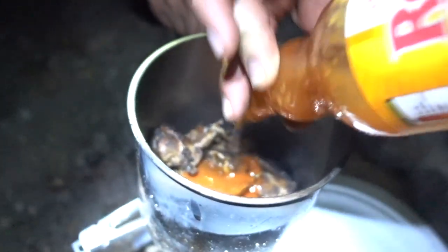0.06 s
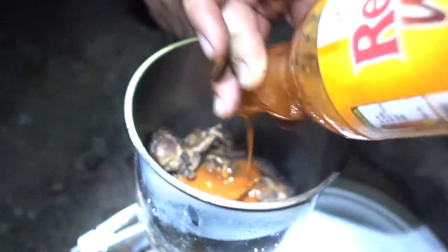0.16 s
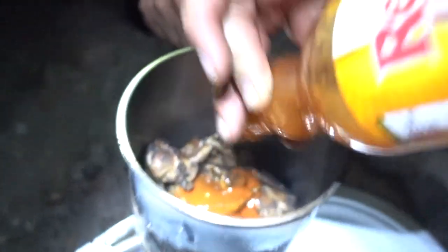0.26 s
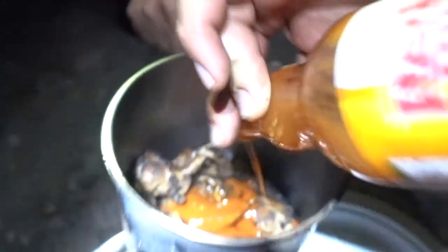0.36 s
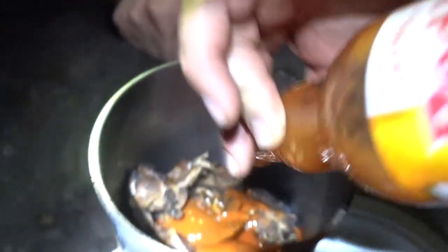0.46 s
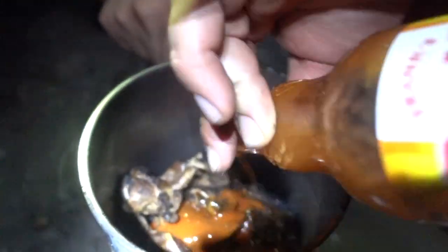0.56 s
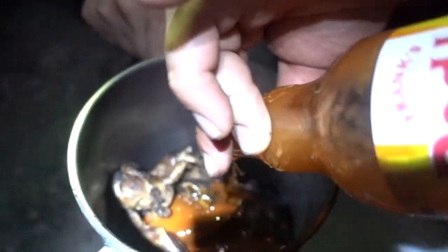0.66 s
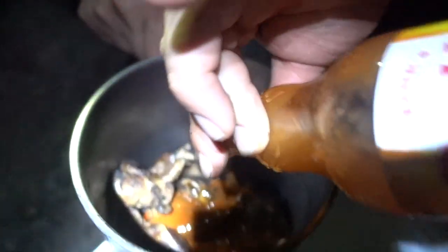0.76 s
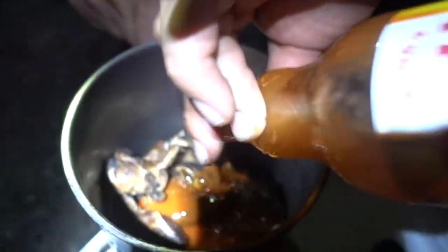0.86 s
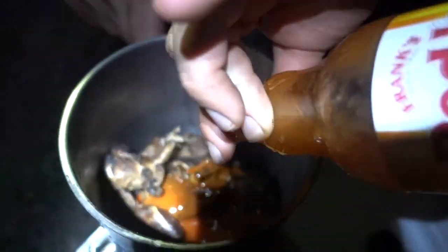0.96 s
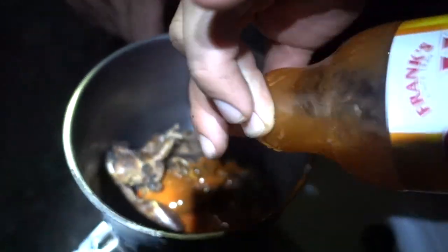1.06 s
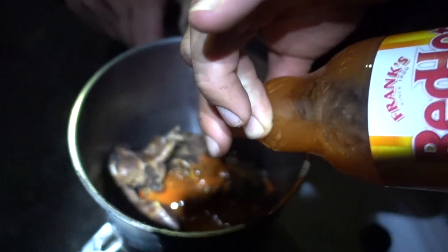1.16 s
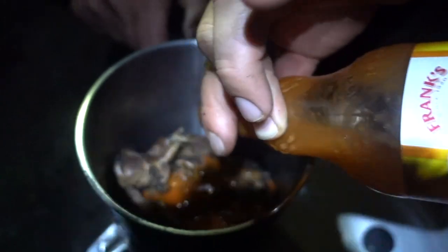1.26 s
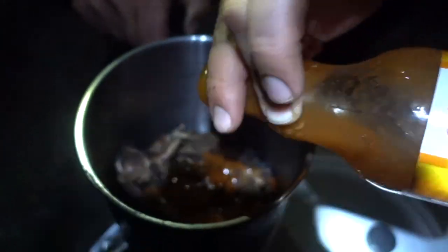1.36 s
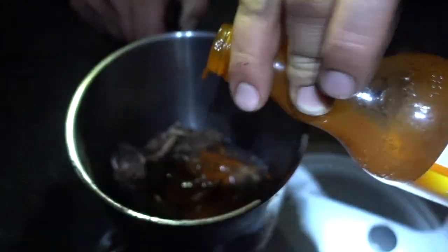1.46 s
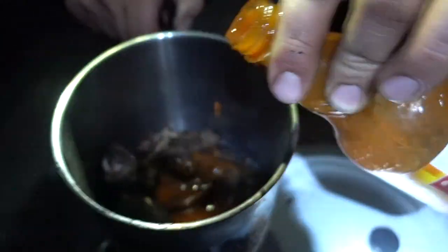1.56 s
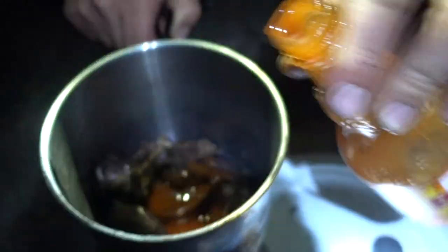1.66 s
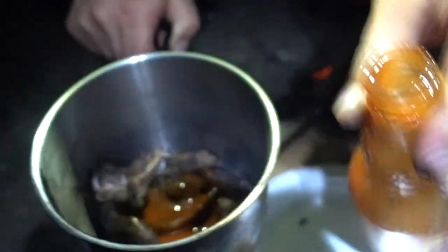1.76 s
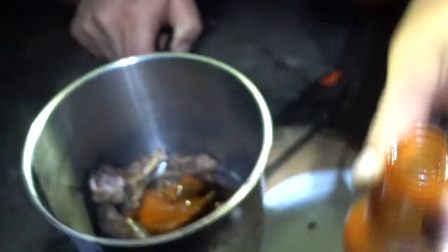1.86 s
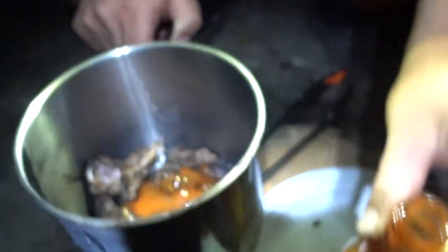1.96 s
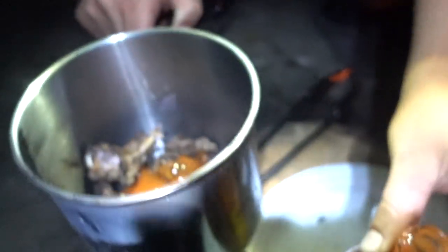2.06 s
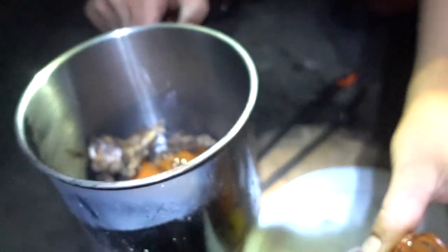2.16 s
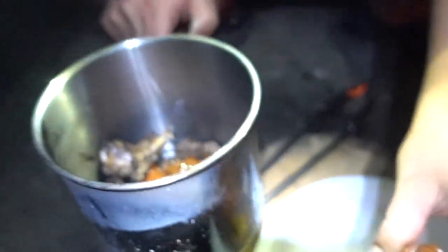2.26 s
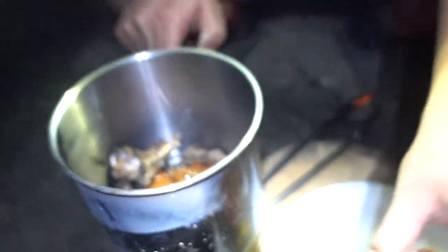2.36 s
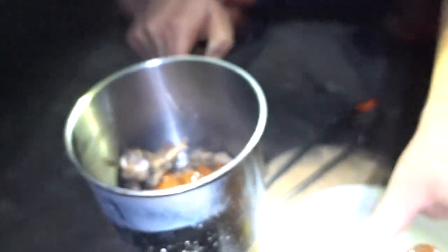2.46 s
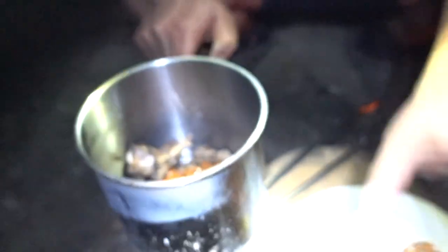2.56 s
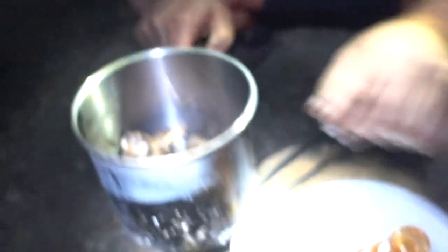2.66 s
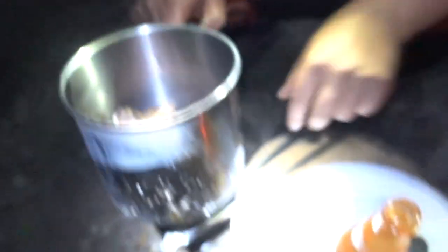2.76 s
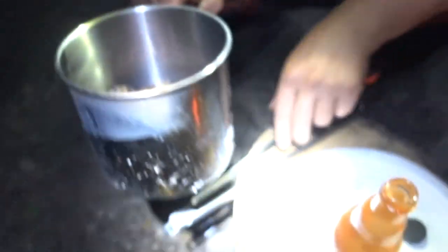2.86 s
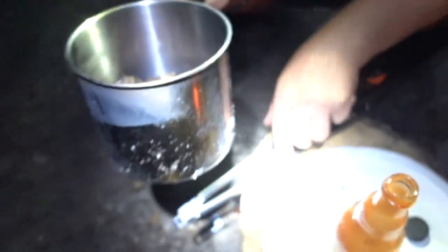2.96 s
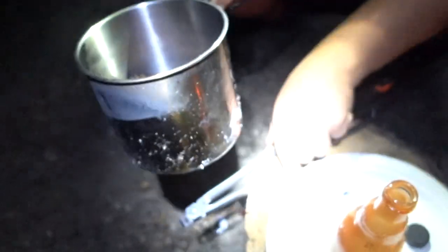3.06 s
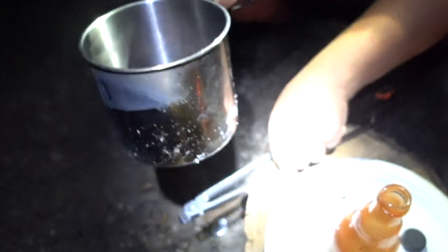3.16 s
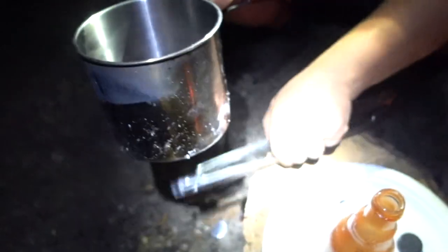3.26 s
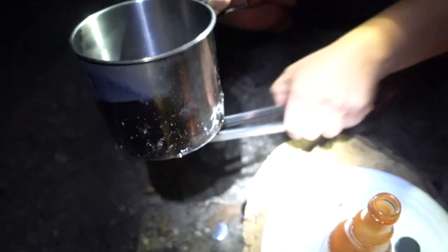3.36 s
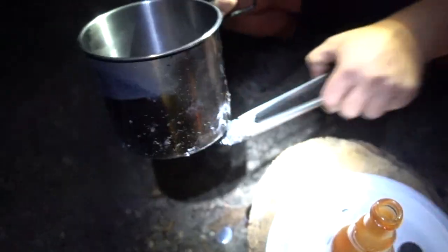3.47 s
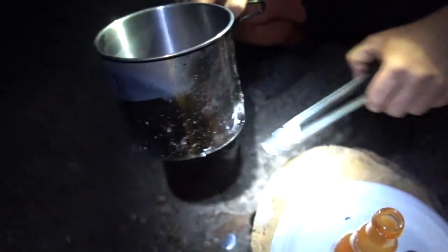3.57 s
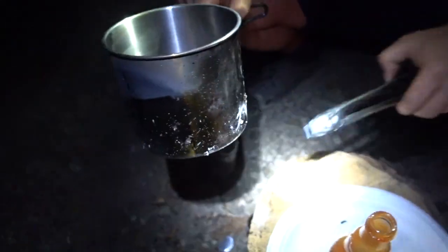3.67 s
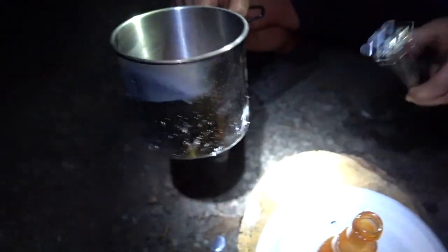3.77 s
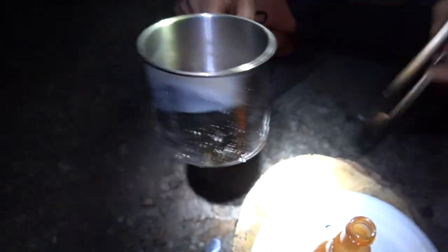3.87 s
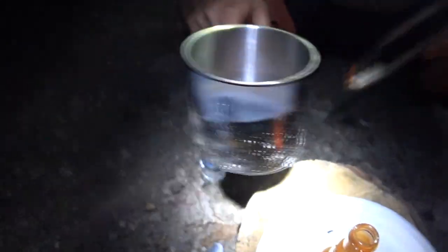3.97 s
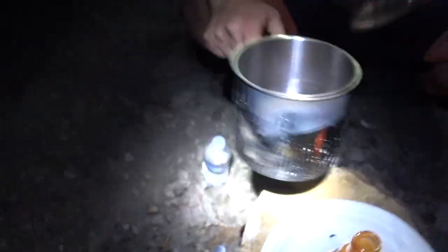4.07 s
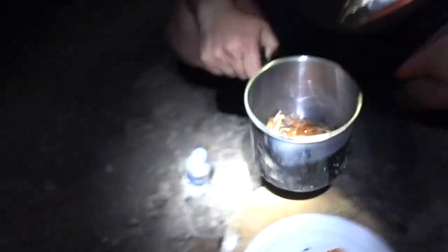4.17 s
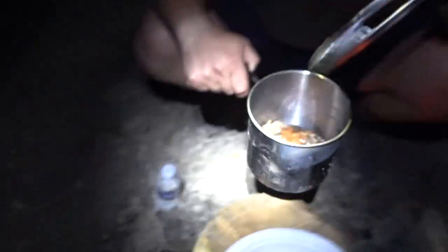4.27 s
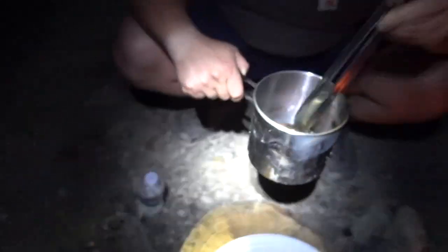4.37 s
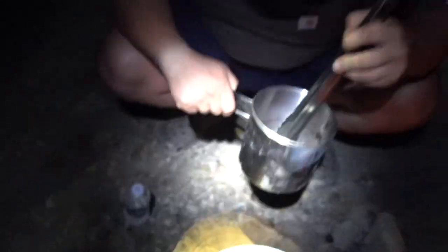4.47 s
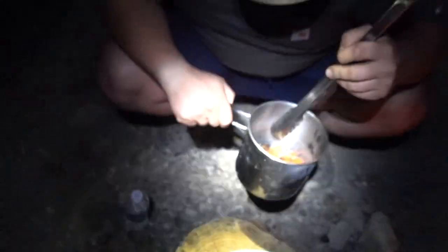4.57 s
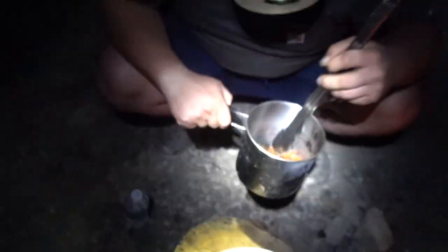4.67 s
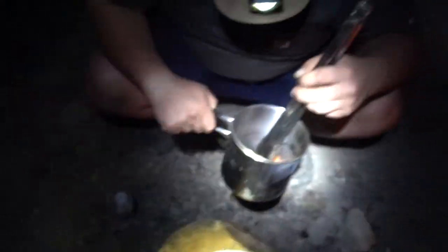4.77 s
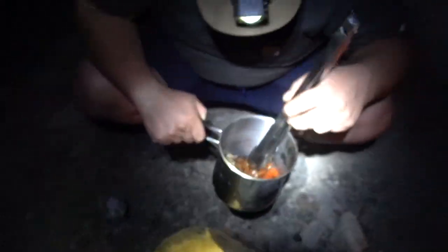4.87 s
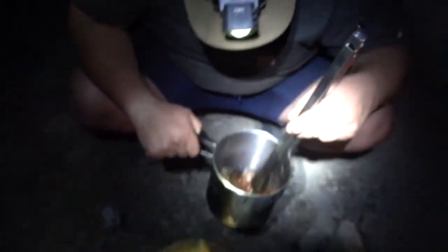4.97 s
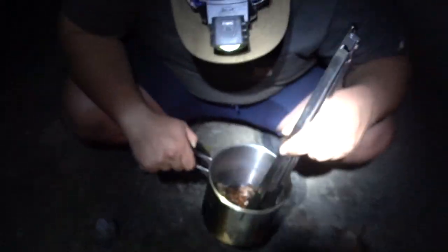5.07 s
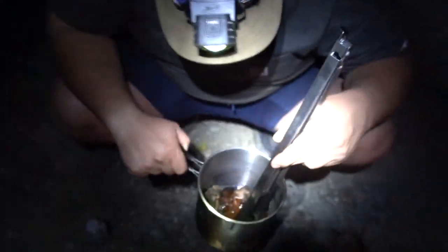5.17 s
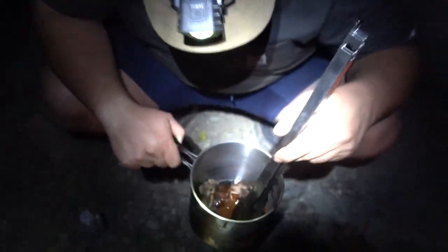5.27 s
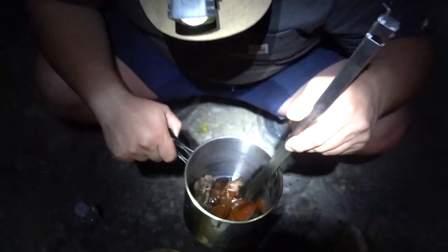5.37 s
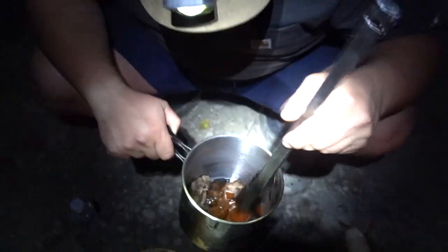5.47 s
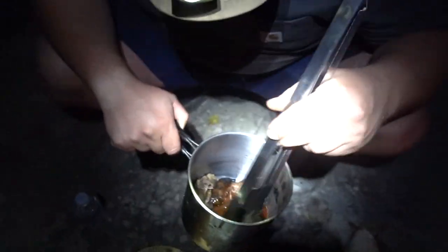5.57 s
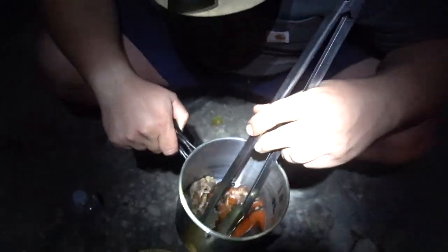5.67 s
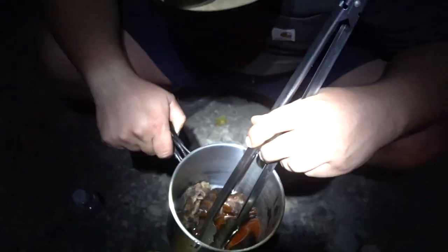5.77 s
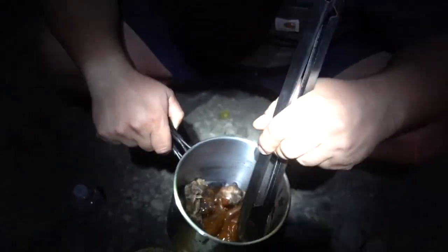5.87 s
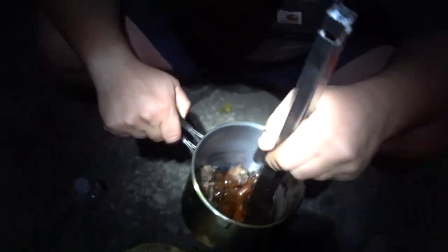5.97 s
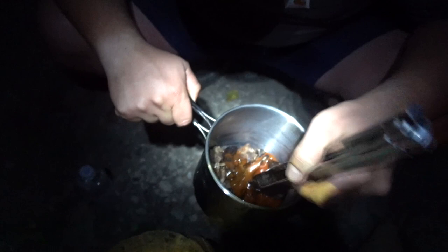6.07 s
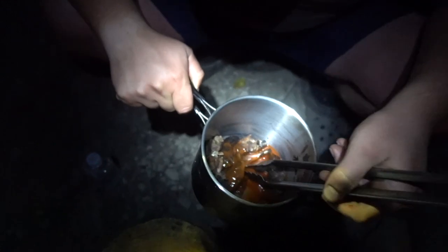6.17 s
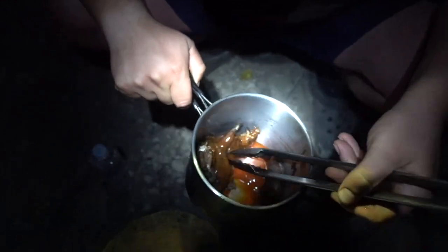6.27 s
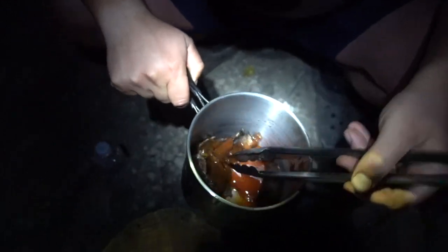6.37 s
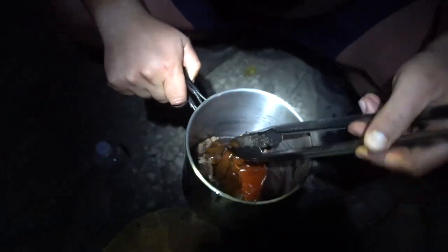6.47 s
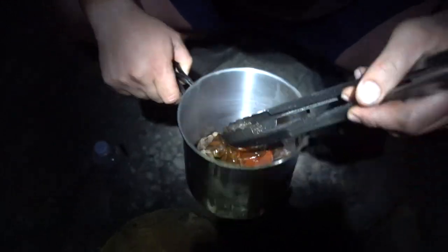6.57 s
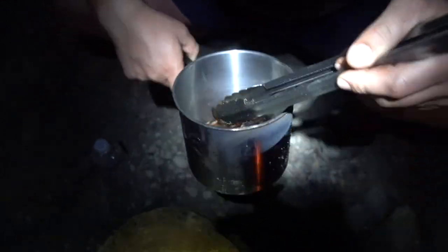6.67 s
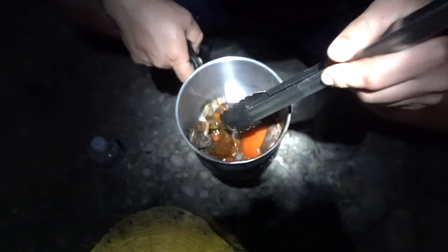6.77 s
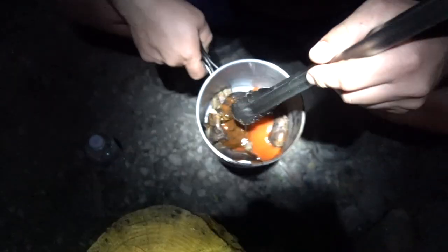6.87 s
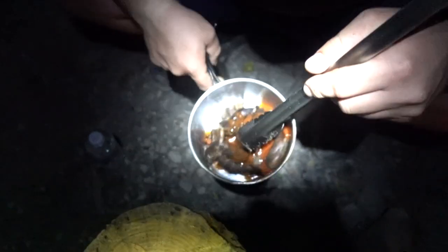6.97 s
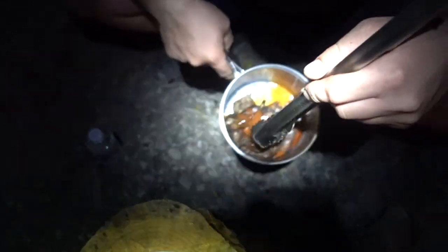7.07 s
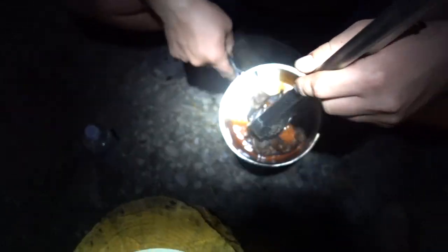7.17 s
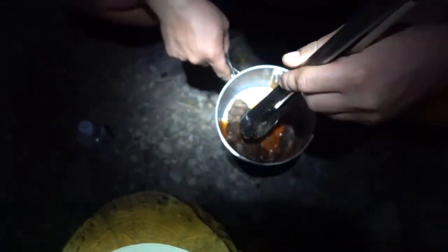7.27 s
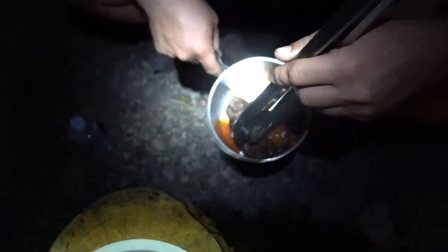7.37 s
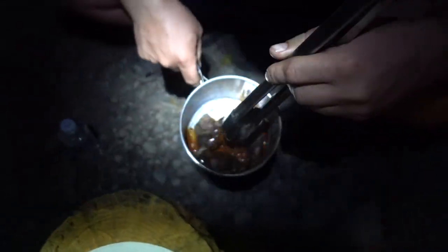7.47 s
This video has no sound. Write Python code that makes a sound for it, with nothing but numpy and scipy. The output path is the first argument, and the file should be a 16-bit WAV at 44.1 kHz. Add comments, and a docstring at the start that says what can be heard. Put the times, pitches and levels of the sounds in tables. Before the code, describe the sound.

Throughout, high insect choruses shimmer around a close outdoor microphone, with faint tyre hiss and low traffic rumble far away. Near crickets, left of centre, chirp briefly around 0.4, 0.9, 1.4, 2.1, 2.6, 3.8 and 5.0 seconds. A distant fuzzy tyre whine and engine hum sink during the first two seconds. Small dry handling ticks appear from 0.7, stronger at 2.1 and 2.7; a thin whistle glides down, up and down from 2.7 to 3.0. At 3.4, tongs strike hollow metal in a quick bright double clank with a brief scrape. A quieter gap follows, with a faint low engine hum. Sharp pot clinks land at 4.6 and 5.0 amid gritty scuffs. From 5.55, damped knocks mix with wet metallic scraping, strongest near 5.9, with crisp hits at 6.2, 6.7 and 6.8. Small, tight knocks and rubs cluster from 7.0 to the end at 7.5.

```python
"""Outdoors at night: steel tongs strike a hollow lid, then knock and scrape in a small hand-held
steel pot with wet food in it. Blows ring vibration modes and rattle; rubs drive them with tiny slips.
Wavering tones and noise make insect choruses all around, and single crickets chirp near by.
Small ticks are bursts of noise and a thin whistle is one gliding tone.
A far road hisses with shaped noise and hums with engine tones."""
import sys
import numpy as np
from scipy import signal
from scipy.fft import rfft, irfft, next_fast_len
from scipy.io import wavfile
from scipy.ndimage import uniform_filter1d, map_coordinates

SR = 44100
rng = np.random.default_rng(int(sys.argv[2]) if len(sys.argv) > 2 else 0)


def magnitude_from_level(level_db):
    """Linear magnitude for a level in decibels (20 dB per decade)."""
    exponent = np.asarray(level_db, float) / 20
    return 10 ** exponent


def dump_mix(stems):
    """Bounce the given channels to the path in sys.argv[1] as a 16-bit WAV at rate SR."""
    frames = np.atleast_2d(stems).T  # one column per channel
    limited = np.clip(frames, -1, 1)  # hard clip at full scale
    pcm = np.round(limited * 32767).astype(np.int16)
    wavfile.write(sys.argv[1], SR, pcm)


N = 331114
T = np.arange(N) / SR  # time of every sample (s)
COARSE_T = T[::16]  # a coarser clock for slow curves (s)


def unit(x):
    """Scale x to an rms of 1."""
    return x / np.sqrt(np.mean(x ** 2) + 1e-20)


def along(points, hz):
    """Read (pitch, value) points on a logarithmic pitch axis."""
    pitch, value = np.transpose(points)
    return np.interp(np.log(hz + 1), np.log(pitch + 1), value)


def curves(rows, silent=None):
    """Draw each column after the time as a curve; silent is its value outside the rows."""
    time_s, *columns = np.transpose(rows)
    return [np.interp(T, time_s, column, silent, silent) for column in columns]


def spread_out(coarse):
    """Stretch a coarse gain curve to every sample."""
    return np.interp(T, COARSE_T, coarse)


def wobble(rate):
    """A smooth random curve with rate random points a second."""
    points = rng.standard_normal(int(N * rate / SR) + 4)
    return spread_out(map_coordinates(points, [COARSE_T * rate]))


def filtered(x, response):
    """Multiply the spectrum of x by a function of frequency."""
    size = next_fast_len(x.shape[-1] + 8192)
    spectrum = rfft(x, size) * response(np.fft.rfftfreq(size, 1 / SR))
    return irfft(spectrum, size)[..., :x.shape[-1]]


def band(x, low_hz, high_hz):
    """Keep the part of x between two pitches."""
    edges = [low_hz, min(high_hz, .45 * SR)]
    return signal.sosfilt(signal.butter(2, edges, "band", fs=SR, output="sos"), x)


def pan(db):
    """Left and right gains for a level difference."""
    return magnitude_from_level([[db / 2], [-db / 2]])


def add(track, start_s, sound):
    """Mix a sound into the track from its start time."""
    part = track[..., round(start_s * SR):][..., :sound.shape[-1]]
    part += sound[..., :part.shape[-1]]


# how alike left and right are in background noise: pitch_hz, likeness (1 = the same)
LIKENESS = [(60, 1.0), (180, 0.98), (550, 0.76), (1650, 0.39), (4970, 0.017), (15000, 0.03)]
# how much louder left is than right in background noise: pitch_hz, left_over_right_db
LEFT_LEAN = [(60, 1.5), (180, -0.5), (550, 3), (1650, 3.5), (4970, 2.5), (15000, -0.5)]


def rush(spectrum, patchy_db):
    """Stereo noise of rms 1 with a given spectrum and patches of random gain in time and pitch."""
    cells = signal.stft(rng.standard_normal((2, N)), nperseg=512)[2]
    patches = uniform_filter1d(rng.standard_normal(cells.shape[1:]), 5, 0)
    patches = unit(uniform_filter1d(patches, 12, 1))
    pair = signal.istft(cells * magnitude_from_level(patchy_db * patches), nperseg=512)[1][:, :N]

    def mid_and_side(hz):
        angle = np.arccos(np.clip(along(LIKENESS, hz), -1, 1)) / 2
        return magnitude_from_level(along(spectrum, hz)) * [np.cos(angle), np.sin(angle)]

    def lean(hz):
        return magnitude_from_level(np.outer([.5, -.5], along(LEFT_LEAN, hz)))

    mid, side = filtered(pair, mid_and_side)
    return unit(filtered(np.array([mid + side, mid - side]), lean))


def narrow(hz, width):
    """A fuzzy tone: a carrier swollen and turned by slow noise."""
    angle = 2 * np.pi * np.cumsum(np.broadcast_to(hz, T.shape)) / SR
    return unit(wobble(width) * np.cos(angle) + wobble(width) * np.sin(angle))


def singer(hz, strokes_per_s, depth, drift_hz):
    """One insect: a wavering tone that swells with every wing stroke."""
    stroke_count = np.cumsum(strokes_per_s * (1 + 0.0234 * wobble(6))) / SR
    beat = 2 * np.pi * (stroke_count + rng.random())
    tone = np.sin(2 * np.pi * np.cumsum(hz + drift_hz * wobble(60)) / SR)
    return unit(tone * np.exp(depth * np.cos(beat)))


# insect choruses: centre_hz, spread_hz, strokes_per_s, likeness of left and right
CHORUSES = [(2600, 78, 31, 0.36), (3197, 170, 57, 0.65), (5590, 260, 96, 0.017)]
# how loud the choruses are over time: time_s, then level_db of each chorus in turn
CHORUS_LEVELS = [(0, -60, -54, -48.5), (1, -56.5, -50, -47), (2, -59.5, -49.5, -49), (2.7, -88, -49, -47),
                 (3.8, -63, -52.5, -46), (4.6, -66, -50, -48), (6.6, -63, -49, -46.5),
                 (7.51, -52, -48, -48.5)]


def choruses():
    """Many singers at scattered pitches, over noise around the same pitch: singers blurred by distance."""
    count, blur = 12, 0.96
    out = np.zeros((2, N))
    for (hz, spread_hz, strokes_per_s, likeness), level_db in zip(CHORUSES, curves(CHORUS_LEVELS)):
        clear = np.zeros((2, N))
        for _ in range(count):
            own_hz = hz + spread_hz * rng.normal()
            own_strokes = strokes_per_s * rng.normal(1, 0.026)
            voice = singer(own_hz, own_strokes, depth=0.64, drift_hz=25) * magnitude_from_level(4.8 * wobble(2.45))
            # some singers are flipped on the right, which makes the sides less alike
            right_sign = np.sign(rng.uniform(-1, 1) + likeness)
            clear += voice * pan(rng.normal(2.1, 11.6)) * [[1], [right_sign]]
        bell = lambda f: np.exp(-((f - hz) / (2.17 * spread_hz)) ** 2)
        noise = filtered(rng.standard_normal((3, N)), bell)
        shared = np.clip(likeness, 0, 1)
        far = (np.sqrt(shared) * noise[0] + np.sqrt(1 - shared) * noise[1:]) * pan(1.5)
        out += magnitude_from_level(level_db) * unit(unit(clear) + blur * unit(far))
    return out


# colour of the far insects: pitch_hz, relative level_db
FAR_INSECTS = [(1500, -33), (2500, -8.5), (4200, -4), (6000, -6), (7400, -1.5), (7900, -24), (8700, -15),
               (9600, -11.5), (11500, -12), (12800, -19.5), (14000, -27), (16500, -90)]


def far_insects():
    """Insects too far off to tell apart: a patchy high rush of noise."""
    return magnitude_from_level(-55) * rush(FAR_INSECTS, patchy_db=3.0)


# loudness of the traffic: time_s, rumble level_db, tyre hiss level_db
TRAFFIC_LEVELS = [(0, -55, -51.5), (.5, -62, -47.5), (1.2, -58.5, -49.5), (1.9, -67.5, -54),
                  (2.4, -65.5, -53.5), (2.8, -61.5, -48.5), (3.3, -60.5, -53.5), (3.6, -54, -53.5),
                  (3.9, -57, -50), (4.3, -59.5, -54), (5.4, -64.5, -54), (6.2, -60.5, -52),
                  (7.51, -61.5, -52)]
# colour of the rumble: pitch_hz, relative level_db
RUMBLE = [(18, -61), (30, -25), (59, -16), (113, -7.5), (188, -1.5), (219, -2), (500, -3.5), (650, 0),
          (1100, -120)]
# colour of the tyre hiss: pitch_hz, relative level_db
TYRE_HISS = [(210, -52), (350, -18), (600, -4.5), (795, -6.5), (1040, -1), (1550, -4), (1730, -9),
             (2540, -9.5), (2700, -16), (3510, -12), (5940, -120)]


def traffic():
    """Far traffic: low rumble and tyre hiss, both shaped noise."""
    rumble_db, tyre_db = curves(TRAFFIC_LEVELS)
    rumble = magnitude_from_level(rumble_db) * rush(RUMBLE, patchy_db=0.5)
    return rumble + magnitude_from_level(tyre_db) * rush(TYRE_HISS, patchy_db=2.0)


# tyres drop in pitch as they pass: time_s, pitch_hz, level_db before panning
TYRE_WHINE = [(0, 1224, -64), (.55, 1307, -54), (.8, 1200, -58), (1, 1073, -61), (1.5, 1058, -56),
              (2.1, 1005, -64)]


def tyre_whine():
    """Tyres whine as a fuzzy tone that mostly sinks in pitch."""
    hz = curves(TYRE_WHINE)[0]
    level_db = curves(TYRE_WHINE, silent=-150)[1]
    return magnitude_from_level(level_db) * narrow(hz, 90) * pan(5.1)


# two passing engines, a list of rows each: time_s, pitch_hz, base level_db
ENGINES = [
    [(0, 105.5, -59), (.214, 110.9, -61.5), (.6, 110, -75.5), (.854, 103, -69), (1.2, 92.4, -77.5),
     (1.4, 95, -90)],
    [(2.5, 50, -84), (2.86, 50.5, -78), (3.36, 51, -79), (3.46, 52.1, -70.5), (4.06, 53.9, -70.5),
     (4.48, 55, -78)],
]
# which multiples of its pitch each engine sounds: three whole numbers per engine
MULTIPLES = [(1, 2, 3), (1, 2, 4)]
# how loud those multiples are: three levels over the base level_db per engine
MULTIPLE_DB = [(0.1, -1.2, -3), (0.1, -.6, 0)]


def engines():
    """Engine hums are stacks of tones; a multiple swells as it passes one boomy pitch."""
    boom_hz, boom_width_hz, boom_db = 278.5, 14.5, 18.5
    out = np.zeros(N)
    for rows, multiples, offsets_db in zip(ENGINES, MULTIPLES, MULTIPLE_DB):
        hz = curves(rows)[0]
        base_db = curves(rows, silent=-150)[1]
        turns = np.cumsum(hz) / SR
        for k, offset_db in zip(multiples, offsets_db):
            boom = boom_db * np.exp(-((k * hz - boom_hz) / boom_width_hz) ** 2)
            gain = magnitude_from_level(base_db + offset_db + boom + 0.93 * wobble(7.6))
            out += np.sqrt(2) * gain * np.sin(2 * np.pi * k * turns)
    return out


# near crickets: start_s, length_s, pitch_hz, level_db before tone and fuzz are mixed and panned
CHIRPS = [(.408, 0.2, 5610, -50), (.888, 0.29, 5520, -50), (1.381, 0.23, 5630, -52),
          (2.128, .29, 5530, -47.5), (2.567, 0.33, 5590, -53.5), (3.787, 0.32, 5530, -47),
          (5.038, 0.31, 5530, -45.5)]


def crickets():
    """Near crickets chirp in turns: each chirp is a stroked tone plus a fuzzy one."""
    attack_s, release_s = 0.013, 0.05
    out = np.zeros((2, N))
    for start_s, length_s, hz, level_db in CHIRPS:
        fade_in = (T - start_s) / attack_s
        fade_out = (start_s + length_s - T) / release_s
        gate = np.clip(np.minimum(fade_in, fade_out), 0, 1)
        voice = 0.42 * singer(hz, 53, depth=1.0, drift_hz=26) + 0.65 * narrow(hz, 180)
        out += magnitude_from_level(level_db + 1.64 * wobble(25)) * gate * voice * pan(15)
    return out


# small dry ticks of bottle, hands and grit: start_s, peak level_db before panning, centre_hz,
# width in octaves, left_over_right_db
TICKS = [(.661, -26, 2800, 1.2, -12), (.859, -29.5, 4500, 1.46, 1.5), (1.43, -36, 2006, 1.2, 2.5),
         (1.536, -36.5, 8300, .34, 6), (1.626, -36, 950, 0.29, 2), (2.139, -24, 1340, 2.7, 2.5),
         (2.509, -39.5, 1050, 0.23, 2.5), (2.705, -27, 1170, .68, 2), (2.932, -35, 1500, 1.7, -1),
         (2.941, -33.5, 800, 1.4, 0), (2.995, -35, 1020, 0.64, 1.5), (3.059, -28.5, 3100, 1.4, 0),
         (3.93, -32, 1500, 1.1, -1.5), (3.954, -37, 1300, 1.6, -2.5), (4.118, -34, 1970, 1.1, 5),
         (4.24, -40, 4530, 0.32, 3), (4.462, -29.5, 1140, 0.2, 3), (4.855, -38, 4000, .5, 0),
         (4.962, -22.5, 1480, 0.5, 8), (5.032, -23.5, 1780, 1.2, 4), (5.087, -28.5, 1130, 0.27, 2.5),
         (5.186, -31, 1260, 0.8, 3), (6.435, -33, 497, 2.9, 2.5), (6.82, -28, 4100, .4, 0),
         (6.873, -32, 1040, 0.51, 1.5), (7.007, -34, 2600, .45, 5)]


def ticks():
    """Short noise bursts without a ring; broader ticks come from bigger things and last longer."""
    out, t = np.zeros((2, N)), np.arange(SR // 20) / SR
    for start_s, level_db, hz, octaves, pan_db in TICKS:
        t60_s = 0.01 + 0.011 * octaves  # time to fall by 60 dB
        spread = 2 ** (max(octaves, .2) / 2)
        noise = rng.standard_normal(len(t)) * magnitude_from_level(-60 * t / t60_s)
        burst = band(noise, hz / spread, hz * spread)
        add(out, start_s, magnitude_from_level(level_db) * pan(pan_db) * burst / np.abs(burst).max())
    return out


# path of the whistle: time_s, pitch_hz (its corners are rounded off)
WHISTLE = [(2.685, 4720), (2.705, 4790), (2.735, 4680), (2.81, 4230), (2.86, 4210), (2.9, 4350),
           (2.945, 4660), (2.975, 4620), (3.045, 4110)]


def whistle():
    """A thin high tone glides down, up and down again, weaker the further it sinks."""
    full_db, full_hz, loss_db_per_hz, fade_s = -46.5, 4690, .034, .015
    hz = uniform_filter1d(curves(WHISTLE)[0], size=700)
    gate = np.clip(np.minimum(T - WHISTLE[0][0], WHISTLE[-1][0] - T) / fade_s, 0, 1)
    level_db = full_db - loss_db_per_hz * np.maximum(full_hz - hz, 0)
    tone = np.sin(2 * np.pi * np.cumsum(hz) / SR)
    return np.sqrt(2) * gate * magnitude_from_level(level_db + 3.6 * wobble(40.1)) * tone * pan(3.7)


TIPPED_S = 6.95  # the pot is tipped from this time on
# the pot's modes, damped by hand and food: pitch_hz when upright, relative level_db, relative ring time
POT = [(251, -28, 0.46), (453, -14.5, 1.64), (560, 5.5, 1.28), (950, -3, 0.5), (1451, 8, 1.83),
       (1520, 18.5, 0.39), (2220, 2.5, 1.03), (2390, -2.5, 1.5), (2700, -7, 2.2), (2988, 11, 0.68),
       (3369, 9, 0.8), (3870, 3.5, 0.74), (4160, -10.5, 2.6), (4880, -3, 0.61), (5340, -10, 0.5),
       (5370, -23, 3.6), (5780, -6.5, 1.2), (6120, -8, 0.37), (6660, -3, 2.5), (7480, 2, 0.96),
       (8120, 2.5, 1.4), (8650, -1, 1.4), (9560, -1, 1.04), (11100, -25, 0.37)]


def pot_modes(tipped):
    """The pot's modes; tipping it makes those under 800 Hz sit lower."""
    return [(hz * (0.793 if tipped and hz < 800 else 1), level_db, ring) for hz, level_db, ring in POT]


def grains(per_second, size_db, smooth):
    """Irregular slips in clumps, over a smooth rub; per_second sets how dense they are."""
    slipping = rng.random(N) < per_second / SR * magnitude_from_level(5 * wobble(40))
    size = magnitude_from_level(size_db * np.clip(rng.standard_normal(N), -2, 2))
    slips = slipping * size * np.sign(rng.standard_normal(N))
    return unit(unit(slips) + smooth * rng.standard_normal(N))


def steady(x, seconds=0.04):
    """Even out the slow level of x, so that only its colour and grain change."""
    return x / np.sqrt(np.abs(uniform_filter1d(x ** 2, int(seconds * SR))) + 1e-20)


def stroke_gains(rows):
    """Gain of each stroke on the coarse clock: a straight rise and fall in dB about its peak."""
    peak_s, rise_s, fall_s, peak_db = np.transpose(rows)[:4, :, None].astype(np.float32)
    t = COARSE_T.astype(np.float32)
    return magnitude_from_level(peak_db - 20 * np.maximum((peak_s - t) / rise_s, (t - peak_s) / fall_s))


def rubbed_steel(wander_db=9.5):
    """Stick-slip grains drive the pot's modes, now harder, now softer, as the contact point slides."""
    slips = grains(600, size_db=6, smooth=.3)
    out = np.zeros(N)
    for tipped, span in ((False, T < TIPPED_S), (True, T >= TIPPED_S)):
        drive = slips[span]
        rubbed = np.zeros(len(drive))
        for hz, level_db, ring in pot_modes(tipped):
            t60_s = .042 * ring * (3000 / hz) ** 0.3  # low modes ring longer under the tongs
            width = np.log(1000) / (np.pi * t60_s)
            mode = lambda f: 1j * f * np.sqrt(width) / (hz * hz - f * f + 1j * f * width)
            rubbed += filtered(drive * magnitude_from_level(level_db + wander_db * wobble(25)[span]), mode)
        add(out, np.argmax(span) / SR, rubbed)
    return out


# tongs dragged through food and over steel, a stroke a row: peak_s, rise_s, fall_s (over 20 dB each),
# level_db of the middle band before rubbing noise is added, body_db over that level
SCRAPES = [(3.477, 0.14, 0.023, -37.5, -0.5), (4.445, 0.026, 0.071, -42, -9), (4.52, .08, 0.22, -47, 2),
           (4.7, 0.14, 0.21, -45, -4), (4.9, 0.034, .1, -47, -18), (4.975, 0.14, 0.078, -38, -5),
           (5.09, .12, 0.19, -41.5, -9), (5.639, .012, 0.06, -38, -7), (5.775, 0.068, 0.031, -39, -1.5),
           (5.885, 0.052, 0.053, -19, -9), (6.035, .012, 0.035, -29.5, -13),
           (6.13, 0.07, 0.12, -37.5, -2.5), (6.191, 0.027, 0.036, -42, 6.5), (6.24, 0.039, 0.14, -39, -5.5),
           (6.315, 0.076, 0.042, -32.5, -8.5), (6.363, 0.028, 0.015, -40, -19),
           (6.51, 0.12, 0.028, -46, -5), (7.056, 0.031, 0.074, -31, -11.5), (7.09, 0.073, 0.041, -47, -1),
           (7.187, 0.11, 0.049, -37.5, -5), (7.331, 0.1, 0.032, -39, -0.5),
           (7.41, 0.037, 0.048, -41.5, -18), (7.45, .05, 0.2, -43.5, -2)]


def scrapes():
    """Rubbed steel and a dry hiss in three bands; harder strokes are brighter, wet ones duller."""
    steel = rubbed_steel()
    dry_rub = grains(1800, size_db=3, smooth=0.54)
    peak_db, body_db = np.transpose(SCRAPES)[3:]
    # sparkle of a gentle (-40 dB) stroke is -62 dB; strokes through food have more body, less sparkle
    sparkle_db = -62 + 1.36 * (peak_db + 40) - peak_db - 0.67 * body_db
    gains = stroke_gains(SCRAPES)
    bands = [(body_db, .3, 300, 1580), (0 * peak_db, .9, 2000, 5870), (sparkle_db, 2.4, 4200, 12700)]
    out = np.zeros(N)
    for over_peak_db, hiss, low_hz, high_hz in bands:
        # the hand's pressure is uneven
        level = spread_out(magnitude_from_level(over_peak_db) @ gains) * magnitude_from_level(1.5 * wobble(80))
        ring = steady(band(steel, low_hz, high_hz))
        out += level * unit(ring + hiss * unit(band(dry_rub, low_hz, high_hz)))
    return out


# the free arms of the tongs ring on: start_s, level_db of the louder arm, pitch_hz of the lower arm,
# t60_s (time to fall by 60 dB)
ARMS = [(3.388, -50, 3820, 0.6), (3.391, -39, 4210, 0.3), (3.805, -52.5, 3905, 0.6),
        (4.6, -35.5, 4050, 0.47), (4.981, -35, 3983, 0.55), (6.678, -39.5, 2790, 0.3)]


def tong_arms():
    """Two arms of nearly the same pitch ring on and beat against each other."""
    out, t = np.zeros(N), np.arange(SR // 2) / SR
    for start_s, level_db, hz, t60_s in ARMS:
        gain = magnitude_from_level(level_db - 60 * t / t60_s + 3 * wobble(114)[:len(t)])
        first = np.sin(2 * np.pi * hz * t)
        second = 0.69 * np.sin(2 * np.pi * (1.012 * hz * t + rng.random()))
        add(out, start_s, gain * (first + second))
    return out


# steel blows: start_s, level_db, weight_db of the low bands and edge_db of the high bands (both over
# the level, before each band's own trim), t60_s (time to fall by 60 dB, before each mode's own factor)
KNOCKS = [(3.3885, -16, -7, -5.5, 0.042), (3.4082, -19, -8.5, -8, 0.08), (3.4326, -37, -3, 1.5, 0.051),
          (3.4775, -36, -24, -10, 0.091), (4.4546, -34, -13.5, 5, 0.061), (4.5985, -15, -19.5, -2, 0.054),
          (4.6117, -17.5, -22, -10, 0.086), (4.7063, -33.5, -16, 5.5, .06), (4.9771, -23.5, -21, -3, 0.064),
          (4.983, -10.5, -30, -5.5, 0.033), (4.9916, -20, -31, -10, .086), (5.0707, -31.5, -15, 9.5, 0.045),
          (5.5554, -18.5, -10.5, -3.5, 0.051), (5.6358, -30.5, -8, 0.5, 0.051),
          (5.8063, -36.5, -18, -5, 0.044), (5.9304, -31.5, -15.5, -1.5, 0.028),
          (6.0271, -18.5, -10, -14, 0.06), (6.2016, -12, -27, -10.5, .036), (6.555, -30, -30, -14, 0.034),
          (6.6799, -14, -18.5, -4.5, 0.075), (6.7943, -13.5, -35, -12, 0.017),
          (6.9757, -37, -27, -3.5, 0.048), (7.044, -34.5, -19, -0.5, 0.036),
          (7.0826, -25.5, -21, -29, 0.037), (7.3031, -28.5, -22, -5, 0.028),
          (7.3207, -23, -16.5, -3, 0.015), (7.3424, -36, -21, -3, 0.036), (7.4008, -35, -30, -23, 0.13),
          (7.4237, -30.5, -23, -8, 0.03), (7.4352, -25, -19.5, -11, 0.022)]
# thud, body, clank, clink and sparkle: low_hz, high_hz
KNOCK_BANDS = [(180, 800), (800, 2000), (2000, 3600), (3600, 6500), (6500, 15500)]
# the hollow lid that the tongs strike as they are picked up: pitch_hz, relative level_db, relative ring time
LID = [(224, -21, 1.5), (442, -13, 1.3), (600, -5, 1.3), (857, -8, 0.97), (1455, -6, 1.36), (2160, 7, 0.37),
       (2880, -17, .8), (3710, 5.5, 0.33), (5330, 12.5, 0.21), (6240, -1, 0.43), (7980, 3, 0.56),
       (9100, -1, 0.52)]


def knocks():
    """Each blow rings the lid or pot and rattles; how hard and where it lands sets bands and damping."""
    pot_reached_s = 4  # the tongs strike the lid before this time and the pot after it
    rattle = (.35, .45, .8, 1.3, 2.6)  # loose chatter against ring, per band
    contact_t60_s, rise_s = 0.0067, 0.00067
    out, t = np.zeros(N), np.arange(SR // 4) / SR
    loudness = lambda x: np.sqrt(np.mean(x[:SR // 100] ** 2))  # rms of the first 10 ms
    for start_s, level_db, weight_db, edge_db, t60_s in KNOCKS:
        on_pot = start_s > pot_reached_s
        modes = pot_modes(start_s > TIPPED_S) if on_pot else LID
        boom_db = 0 if on_pot else 3.5  # the hollow lid shifts weight from body to thud
        rings = []
        for hz, mode_db, ring in modes:
            luck, detune = rng.standard_normal(2)
            fade = magnitude_from_level(mode_db + 5 * luck - 60 * t / (t60_s * ring))
            rings.append(fade * np.sin(2 * np.pi * hz * (1 + 0.012 * detune) * t + 2 * detune))
        # a sharp first contact, then loose chatter of steel on steel
        fade = 1.3 * magnitude_from_level(-60 * t / contact_t60_s) + magnitude_from_level(-60 * t / (1.18 * t60_s))
        chatter = rng.standard_normal(len(t)) * fade
        bands_db = (weight_db - 2.5 + boom_db, weight_db + 3 - boom_db, -7, edge_db, edge_db - 6.5)
        for (low_hz, high_hz), band_db, loose in zip(KNOCK_BANDS, bands_db, rattle):
            ring = sum(r for r, mode in zip(rings, modes) if low_hz <= mode[0] < high_hz)
            rough = band(chatter, low_hz, high_hz)
            swell = 1 - np.exp(-t * low_hz / 0.43)  # low bands take longer to build up
            part = ring * swell / loudness(ring) + loose * rough / loudness(rough)
            onset = 1 - np.exp(-t / rise_s)
            add(out, start_s, magnitude_from_level(level_db + band_db) * onset * part / loudness(part))
    return out


# the pot's foot scuffs over grit: peak_s, rise_s, fall_s (over 20 dB each), level_db at the peak
SCUFFS = [(3.5, 0.024, 0.14, -46.5), (3.93, 0.054, 0.084, -57), (4.1, .07, 0.14, -45), (4.47, .02, .1, -42),
          (4.52, .06, .3, -37), (4.72, 0.067, 0.089, -44.5), (4.91, .03, .2, -39), (4.96, .1, 0.11, -37),
          (5.1, 0.13, 0.26, -49)]
# colour of the grit: pitch_hz, relative level_db
GRIT = [(250, -24), (500, -16), (850, -14), (1200, -1.5), (1450, -2.5), (1900, -14.5), (3000, -17),
        (8000, -48)]


def scuffs():
    """The pot's foot slips over gritty ground: grains shaped by the grit's colour."""
    grit = filtered(grains(700, size_db=2.5, smooth=0.53), lambda hz: magnitude_from_level(along(GRIT, hz)))
    return spread_out(stroke_gains(SCUFFS).sum(axis=0)) * unit(grit)


def ground(x, t60_s=0.038):
    """Near ground, legs and hands throw back a short bright answer, different on each side."""
    t = np.arange(SR // 8) / SR
    tail = band(rng.standard_normal((2, len(t))), 3000, SR / 2) * magnitude_from_level(-60 * t / t60_s) * (t > .0005)
    return signal.fftconvolve(x[None], tail / np.linalg.norm(tail[0]), axes=1)[:, :N]


# the microphone's response to near sounds: pitch_hz, gain_db
NEAR_RESPONSE = [(40, -46), (150, -12), (300, 0), (11000, 0), (13500, -19), (15500, -21), (16500, -40)]


def scene():
    """Pot and tongs close in front, night all around."""
    night = choruses() + far_insects() + traffic() + tyre_whine() + engines() + crickets() + whistle()
    pot_and_tongs = scrapes() + tong_arms() + knocks() + scuffs()
    near = pot_and_tongs * pan(1.6) + magnitude_from_level(-5) * ground(pot_and_tongs) + ticks()
    return filtered(near, lambda hz: magnitude_from_level(along(NEAR_RESPONSE, hz))) + night


def top_cut(x):
    """Nothing passes above the cut-off."""
    return signal.sosfilt(signal.butter(12, 16480, fs=SR, output="sos"), x)


def record(dry):
    """Turn the finished mix into the sound that is stored."""
    return top_cut(dry)


dry = scene()
out = record(dry)
dump_mix(out)
```